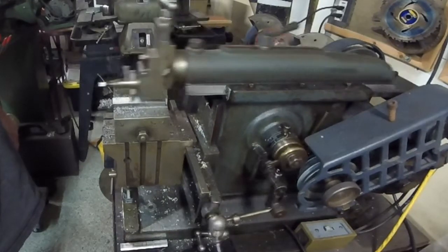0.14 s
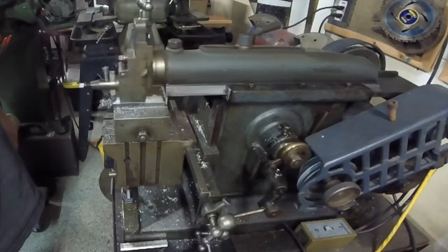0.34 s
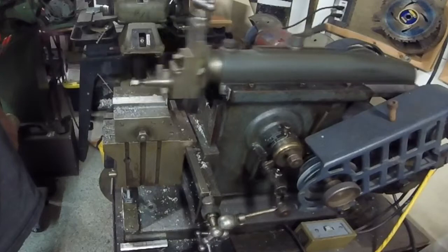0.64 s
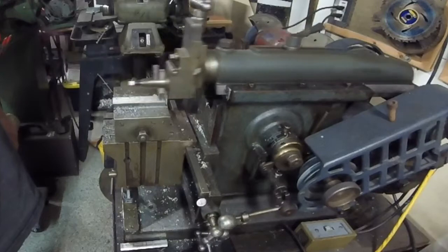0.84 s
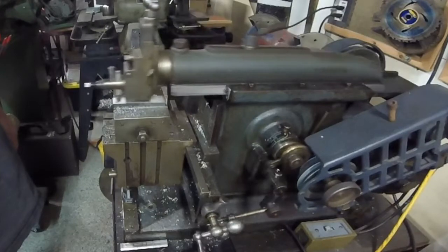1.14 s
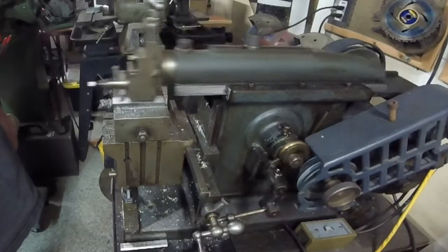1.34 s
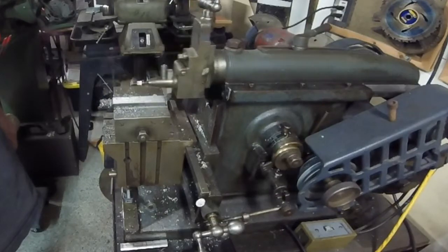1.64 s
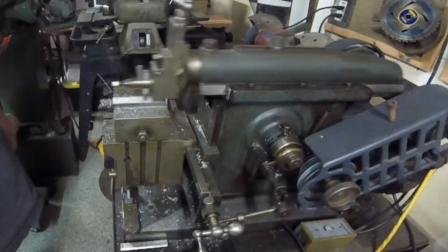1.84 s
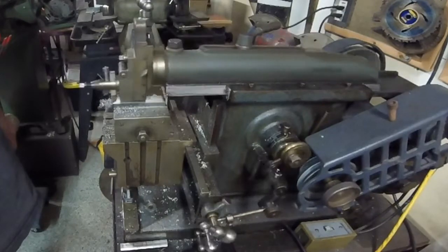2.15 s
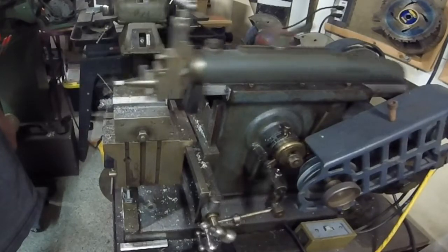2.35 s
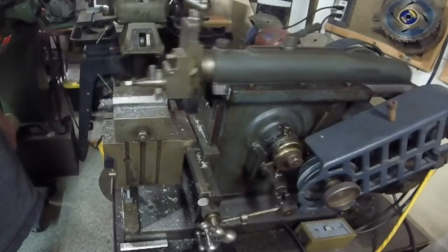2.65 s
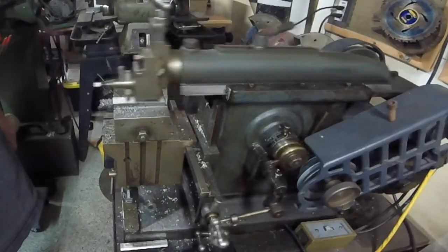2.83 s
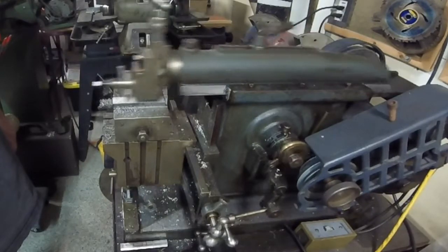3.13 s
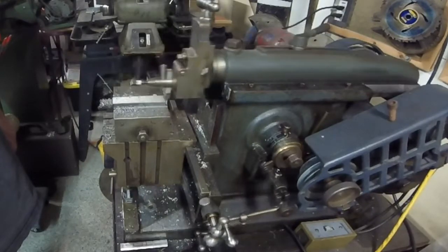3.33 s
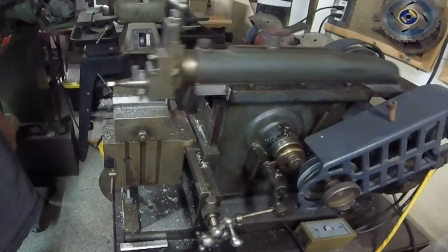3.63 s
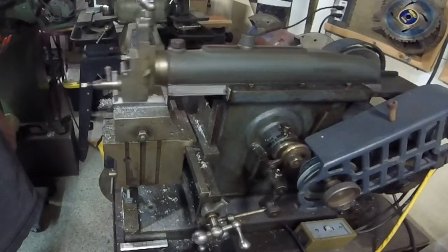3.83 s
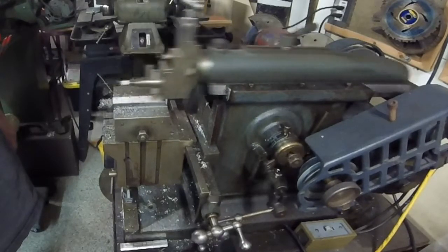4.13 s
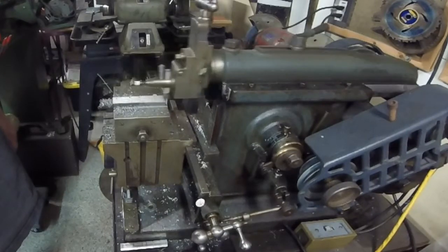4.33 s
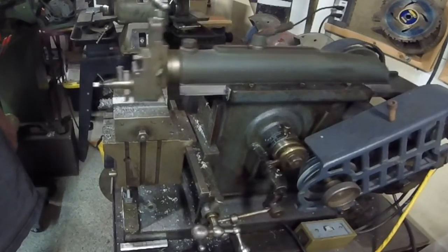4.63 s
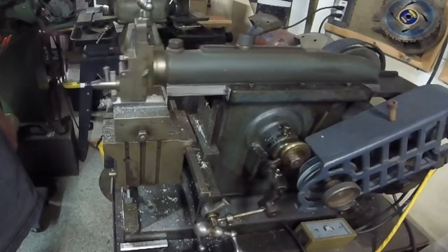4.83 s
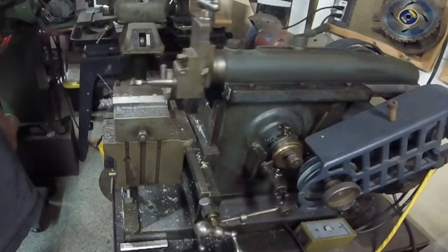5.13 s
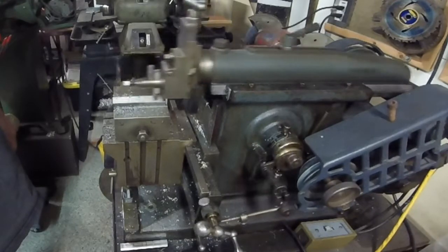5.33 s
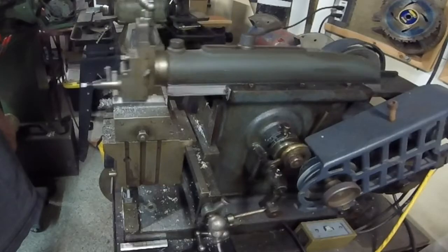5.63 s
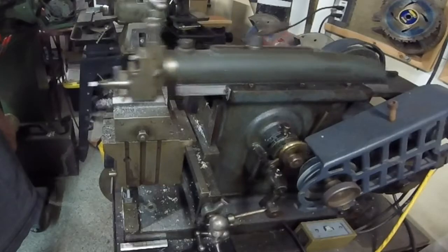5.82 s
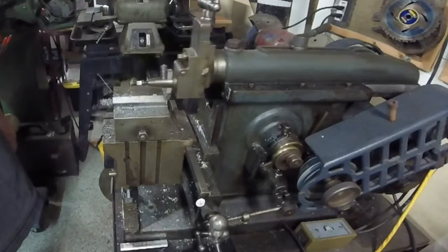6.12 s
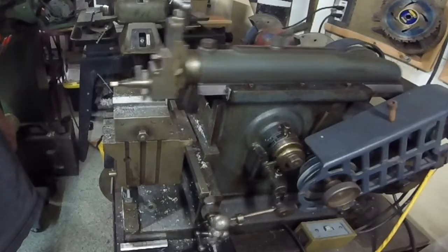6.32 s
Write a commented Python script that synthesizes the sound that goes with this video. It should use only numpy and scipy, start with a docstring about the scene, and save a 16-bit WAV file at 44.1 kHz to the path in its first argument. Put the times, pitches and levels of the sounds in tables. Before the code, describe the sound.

A metal shaper runs for about six and a half seconds, heard from close beside it in a small workshop with a short echo. A low electric motor hum and belt noise continue throughout. Every 0.9 seconds a ratchet gives four quick, bright metallic clicks, starting at about 0.6, 1.4, 2.3, 3.2, 4.1, 5.0 and 5.9 seconds. Just after each burst, the linkage gives a dull knock and then a softer one, with a slight metallic ring. The gears rumble louder as the sliding arm drives forward, then ease off, along with a faint rubbing of oiled rails. An extra thud comes near 2 seconds. The cutting tool scrapes the metal lightly with a thin ringing edge at around 2.7 seconds, more faintly near 3.8 and 5.4, and most clearly at about 6.2. The rhythm stays even to the end.

```python
"""In a small workshop, a metal shaper (a machine that planes metal) makes one stroke every 0.9 s.
Its motor hums throughout. The gears rumble louder the faster the ram, the sliding arm that holds
the tool, drives forward. The linkage knocks when the ram turns and again as it gathers speed.
As the ram returns, the feed pawl, a small catch, clicks over four teeth of a ratchet wheel.
Now and then the tool scrapes the work."""
import sys
import numpy as np
from scipy import signal
from scipy.fft import rfft, irfft, next_fast_len
from scipy.io import wavfile

SR = 44100
rng = np.random.default_rng(int(sys.argv[2]) if len(sys.argv) > 2 else 0)


def generate_wav(sig):
    """Save sig (samples, or channels by samples) to the path in sys.argv[1] as 16-bit PCM at SR."""
    pcm = np.round(np.clip(np.atleast_2d(sig).T, -1, 1) * 32767).astype(np.int16)
    wavfile.write(sys.argv[1], SR, pcm)


N = 285315
TIME = np.arange(N) / SR
GEAR_REST_DB = -35.5  # gear level while the ram stands still

# One row per stroke, starting at its first pawl click; levels are relative: start_s, pawl_db, treble_db,
# clank_db, gear_load_db, thud_db, rod_turn_db, rod_speedup_db, hum_dip_delay_s, hum_change_db
STROKES = [(-0.337, -19, 3, 0, -0.5, -28, -40, -34.5, 0.29, 6),
           (0.5524, -18.5, 3, 0, -1.5, -4.5, -32.5, -33.5, .272, -8),
           (1.4422, -16.5, 4.5, 4.5, -0.7, 0, -46, -35.5, 0.33, -6),
           (2.3306, -16.5, 4.5, -2, 0, -3, -43, -31.5, 0.32, -21),
           (3.2167, -17.5, 5, -1, -0.5, -0.5, -37.5, -34, 0.25, -2),
           (4.1083, -18.5, 4, 4, -1, -2.5, -36, -32.5, 0.32, -15),
           (5.0196, -18, 3.5, 0.5, -1.4, 1, -39, -41, 0.26, -4),
           (5.906, -19.5, 5.5, -4, -1.5, -0.5, -30.5, -27.5, 0.3, -31)]
# Tone of the gears: pitch_hz, level_db
GEAR_TONE = [(100, -29), (135, 1), (185, -9.5), (270, -3), (340, 2.5), (450, -8.5), (560, -2), (660, -7.5),
             (800, -17.5), (1100, -20.5), (2200, -56)]
# Tone of the rails the ram slides on: pitch_hz, level_db
RAIL_TONE = [(500, 7), (850, 7.5), (1100, -1), (1500, -1), (1850, 4), (2120, 3), (2350, -12.5), (3200, -10),
             (5200, -13), (5600, -17.5), (6500, -11), (7300, -20), (8100, -14), (9000, -21), (12000, -26.5),
             (15000, -50)]
# Pitches that the cast metal body boosts or swallows: pitch_hz, width_hz, boost_db
BODY_PEAKS = [(151.6, 5.1, 4.5), (210, 14.5, 6.5), (235.6, 14, -12), (267.7, 10, 11), (316, 5.6, 3),
              (500, 12, 2), (546, 7.7, 11.5), (660, 33, 4.5), (762.6, 10.5, 5.5), (882, 13, 8),
              (1040, 20, -1), (1215, 36, 7.5), (1436, 14, 6), (5250, 78, 13)]


def from_db(db):
    """Turn decibels into a factor to multiply by."""
    return 10 ** (np.asarray(db) / 20)


def rms_one(x):
    """Scale a signal to an average strength (rms) of 1."""
    return x / np.sqrt(np.mean(x ** 2) + 1e-20)


def drift(rate_hz):
    """A random wobble of strength 1, mostly slower than rate_hz."""
    step = 40
    count = N // step + 2
    hz = np.fft.rfftfreq(count, step / SR)
    slow = irfft(rfft(rng.standard_normal(count)) / (1 + (hz / rate_hz) ** 2))
    return np.interp(np.arange(N) / step, np.arange(len(slow)), rms_one(slow))


def colour(x, tone, peaks=()):
    """Give a signal the broad tone and narrow peaks of an object; the result has strength 1."""
    size = next_fast_len(len(x), True)
    hz = np.fft.rfftfreq(size, 1 / SR) + 1e-3
    points, levels = np.transpose(tone)
    db = np.interp(np.log(hz), np.log(points), levels)
    for centre, width, peak_db in peaks:
        db = db + peak_db / (1 + (2 * (hz - centre) / width) ** 2)
    roll_off = np.minimum(1, hz / points[0]) ** 2 * np.minimum(1, points[-1] / hz) ** 2
    return rms_one(irfft(rfft(x, size) * from_db(db) * roll_off, size)[:len(x)])


def fade(t, fade_s):
    """Die away by 60 dB every fade_s seconds."""
    return np.exp(-np.log(1000) * t / fade_s)


def ring(notes, t, spread_db):
    """A struck object rings with several fading notes, each at a slightly random strength."""
    hz, db, fade_s = np.transpose(notes)[:, :, None]
    strength = from_db(db + spread_db * rng.standard_normal(hz.shape)) * rng.choice([-1, 1], hz.shape)
    return np.sum(strength * np.sin(2 * np.pi * hz * t) * fade(t, fade_s), axis=0)


def add(track, start_s, sound):
    """Mix in a sound if its start lies within the track."""
    start = round(start_s * SR)
    if 0 <= start < N:
        track[start:start + len(sound)] += sound[:N - start]


def swing(start_s, length_s):
    """The ram's speed on one crank-driven pass: from 0 up to 1 and back."""
    return np.sin(np.pi * np.clip((TIME - start_s) / length_s, 0, 1))


def drive_levels(turn_s=0.258, return_s=0.355):
    """Gear and ram levels in dB follow the ram's speed: quickly back, then more slowly forward."""
    periods = np.diff([row[0] for row in STROKES])
    forward = back = load_db = 0
    for (start_s, _, _, _, gear_load_db, *_), period in zip(STROKES, [*periods, np.median(periods)]):
        speed = swing(start_s + turn_s, period - return_s)
        forward += speed
        load_db += gear_load_db * speed
        back += swing(start_s + turn_s - return_s, return_s)
    gear_db = GEAR_REST_DB + 13 * forward + 0.5 * back + load_db
    ram_db = -47.5 + 9.5 * forward + 4 * back
    return gear_db, ram_db


def hum_dips(width_s=0.02, swell_delay_s=0.09, swell_share=0.15, steady_db=0.33):
    """The hum briefly dips and swells once a stroke, beating against a nearby low resonance."""
    level_db = steady_db
    for start_s, *_, delay_s, change_db in STROKES:
        t = TIME - start_s - delay_s
        dip = np.exp(-(t / width_s) ** 2)
        swell = swell_share * np.exp(-((t - swell_delay_s) / width_s) ** 2)
        level_db += change_db * (dip - swell)
    return level_db


def motor(gear_db, wobble_hz=7, belt_rest_db=-34.5, follow_share=0.27):
    """Mains power makes a magnetic hum, shaken by belts that run rougher as the gears work harder."""
    # The notes of the hum: pitch_hz, level_db, wobble_share (0 to 1)
    hum_notes = [(59.4, -51.5, 0.2), (120.33, -26.5, 0.03), (240.6, -40.5, 0.41), (359.8, -38, 0.36)]
    # Tone of the belts and motor fan: pitch_hz, level_db
    belt_tone = [(12, -24), (28, -6.5), (60, -0.5), (92, -8), (112, 13), (138, 13.5), (175, -4),
                 (260, -5.5), (350, -3), (450, -20), (600, 0.5), (1000, -19), (2100, -25.5), (2600, -25),
                 (6500, -38.5), (12000, -63)]
    hum = np.zeros(N)
    for hz, db, wobble in hum_notes:
        phase = 2 * np.pi * (hz * TIME + rng.random())
        note = (1 + wobble * drift(wobble_hz)) * np.sin(phase)
        pitch_waver = wobble * drift(wobble_hz) * np.cos(phase)
        hum += np.sqrt(2) * from_db(db) * (note + pitch_waver)
    belt_db = belt_rest_db + follow_share * (gear_db - GEAR_REST_DB)
    belts = from_db(belt_db) * colour(rng.standard_normal(N), belt_tone, BODY_PEAKS)
    return hum * from_db(hum_dips()) + belts


def gears(level_db, clashes_per_s=500, spread_db=2.4, churn_db=-3):
    """Worn teeth clash unevenly and shake the machine's body."""
    sizes = from_db(spread_db * np.minimum(rng.exponential(1, N), 4)) * rng.choice([-1, 1], N)
    clashes = rms_one(sizes * (rng.random(N) < clashes_per_s / SR))
    churn = from_db(churn_db) * rng.standard_normal(N)
    return from_db(level_db) * colour(clashes + churn, GEAR_TONE, BODY_PEAKS)


def ram(level_db):
    """The ram rubs along its oiled rails with a slightly uneven grip."""
    grip_db = drift(rate_hz=27)
    return from_db(level_db + grip_db) * colour(rng.standard_normal(N), RAIL_TONE, BODY_PEAKS)


def knocks(contact_s=0.0017, thud_trim_db=-1, falloff_db_per_octave=16):
    """Slack in the drive snaps shut: gears judder, the main column thuds, the feed rod rings."""
    # Knocks as the ram turns and as it speeds up: delay_s, thud_db, strongest_rod_pitch_hz
    slack_knocks = [(0.259, -22.5, 2098), (0.408, -29, 1690)]
    # Ringing of the cast column: pitch_hz, level_db, fade_s
    column_notes = [(290, -0.5, 0.091), (322, 6.5, 0.039), (348, 3.5, 0.063), (560, -13.5, 0.017),
                    (620, -10, 0.066)]
    # Ringing of the feed rod: pitch_hz, level_db, fade_s
    rod_notes = [(1314, 4, 0.11), (1850, 4.5, 0.15), (1910, -12, 0.1), (2064, 3, 0.13), (2174, -3, 0.1),
                 (2420, 4.5, 0.042)]
    # Stray bumps of the column in mid-stroke: start_s, level_db
    bumps = [(1.047, -19), (1.958, -10), (2.048, -22), (2.154, -26), (5.524, -14), (5.685, -22)]
    out, t = np.zeros(N), TIME[:SR // 4]
    onset = 1 - np.exp(-t / contact_s)
    for start_s, *_, thud_db, turn_db, speedup_db, _, _ in STROKES:
        for (delay_s, column_db, strongest_hz), rod_db in zip(slack_knocks, (turn_db, speedup_db)):
            judder = from_db(-1) * colour(rng.standard_normal(len(t)), GEAR_TONE) * fade(t, 0.2)
            column = ring(column_notes, t, spread_db=1.5)
            thud = from_db(column_db + thud_db + thud_trim_db) * (column + judder)
            rattle = from_db(-2) * colour(rng.standard_normal(len(t)), RAIL_TONE) * fade(t, 0.12)
            notes = [(hz, db - falloff_db_per_octave * abs(np.log2(hz / strongest_hz)), fade_s)
                     for hz, db, fade_s in rod_notes]
            rod = from_db(rod_db) * (from_db(-4) * ring(notes, t, spread_db=0.5) + rattle)
            add(out, start_s + delay_s, onset * (thud + rod))
    for start_s, db in bumps:
        add(out, start_s, onset * from_db(db + thud_trim_db) * ring(column_notes, t, spread_db=1.5))
    return workshop_echo(out)


def workshop_echo(x, echo_db=-7, fade_s=0.15):
    """The cluttered walls add a short, blurred echo to a sound."""
    t = TIME[:SR // 2]
    tail = rng.standard_normal(len(t)) * fade(t, fade_s) * (t > 0.005)
    return x + from_db(echo_db) * signal.fftconvolve(x, tail / np.linalg.norm(tail))[:N]


def ratchet(echo_s=0.0058, alike_share=0.65, edge_hz=6000, clank_hz=(2880, 3700), build_s=0.001):
    """The pawl snaps onto the wheel, which rings; the crack bounces off the machine and the room."""
    # Tone of the wheel's crack: pitch_hz, level_db
    wheel_tone = [(400, 9.5), (900, -0.5), (1300, 4.5), (2050, 3), (2450, -4), (3150, 3), (4000, 1.5),
                  (5300, 3), (5650, -6), (6200, 4), (7450, -4), (8100, -2), (9300, -8.5), (12200, -12.5),
                  (15000, -35)]
    # Ringing of the wheel: pitch_hz, level_db, fade_s
    wheel_notes = [(1222, 3.5, 0.11), (1405, -2.5, 0.11), (1510, -9, 0.058), (2034, 2.5, 0.11),
                   (2530, -1, 0.06), (3050, 4.5, 0.049), (3180, -3, 0.076), (3200, -3, 0.2),
                   (3400, -5, 0.072), (3580, -4, 0.2), (3900, -3, 0.14), (4340, -3, 0.11),
                   (4740, -5, 0.058), (5170, 1.5, 0.078), (5350, 2, 0.089), (5960, -8, 0.22),
                   (6600, -15, 0.093), (6480, -6, 0.23), (6890, -7.5, 0.2), (7925, -10, 0.19),
                   (8300, -6, 0.29), (11200, -22, 0.17)]
    # The pawl drops off each tooth in turn: delay_s, level_db
    teeth = [(0, -1.1), (0.0533, -0.2), (0.106, 0), (0.166, -0.44)]
    out, t = np.zeros(N), TIME[:SR // 3]
    echo = from_db(-0.5) * fade(np.abs(t - echo_s), 0.051) * (t > echo_s)
    room_tail = from_db(-8.5) * fade(t, 0.41) * (t > echo_s)
    crack_shape = np.sqrt(fade(t, 0.033) ** 2 + echo ** 2 + room_tail ** 2)
    # every tooth rings the same wheel, but is hit a little differently
    shared_noise = np.sqrt(alike_share) * rng.standard_normal(len(t))
    treble_filter = signal.butter(1, edge_hz, "high", fs=SR, output="sos")
    clank_filter = signal.butter(1, clank_hz, "band", fs=SR, output="sos")
    for start_s, pawl_db, treble_db, clank_db, *_ in STROKES:
        for delay_s, tooth_db in teeth:
            own_noise = np.sqrt(1 - alike_share) * rng.standard_normal(len(t))
            crack = from_db(-9) * colour(shared_noise + own_noise, wheel_tone) * crack_shape
            click = crack + from_db(-21) * ring(wheel_notes, t, spread_db=3)
            click += (from_db(clank_db) - 1) * signal.sosfilt(clank_filter, click)
            # the bright edge of steel on steel comes at once; the rest takes a moment to build
            edge = signal.sosfilt(treble_filter, click)
            body = (click - edge) * (1 - np.exp(-t / build_s))
            add(out, start_s + delay_s, from_db(pawl_db + tooth_db) * (from_db(treble_db) * edge + body))
    return out


def scrapes(rough_db=0.5, ring_s=0.1):
    """The tool's edge catches the work, and its holder sings briefly at many pitches."""
    # Each catch of the tool: start_s, level_db, rise_s, fade_s
    catches = [(2.610, -34.5, 0.0094, 0.46), (2.761, -33.5, 0.021, 0.46), (3.721, -40, 0.0035, 0.097),
               (3.924, -39.5, 0.004, 0.23), (4.445, -45, .008, 0.53), (5.420, -40, 0.019, 0.56),
               (5.600, -48, 0.0067, 0.18), (6.222, -30, 0.015, 0.39), (6.312, -31, .05, 0.46)]
    # Tone of the tool: pitch_hz, level_db
    tool_tone = [(700, 3), (2000, -1.5), (2400, -5.5), (3200, 2), (5000, 1.5), (6500, 1), (7400, -3),
                 (8400, -1.5), (9300, -8), (11500, -12), (15000, -28)]
    # Pitches that the tool boosts or swallows: pitch_hz, width_hz, boost_db
    tool_peaks = [(1443, 22, 23), (2114, 40, 19.5), (3090, 28, 10.5), (3350, 36, 6.5), (4260, 70, -12),
                  (4200, 26, 16), (5120, 110, 14.5), (5850, 28, 4), (6450, 140, 7), (7100, 35, 7),
                  (7990, 80, 11), (9350, 100, 9), (11000, 80, 6)]
    force, t = np.zeros(N), TIME[:SR // 5]
    for start_s, db, rise_s, fade_s in catches:
        age = TIME - start_s
        force += from_db(db) * np.clip(age / rise_s, 0, 1) * fade(np.maximum(age - rise_s, 0), fade_s)
    friction = rng.standard_normal(N)
    holder_ring = rng.standard_normal(len(t)) * fade(t, ring_s)
    holder = rms_one(signal.fftconvolve(friction, holder_ring)[:N])
    roughness = from_db(rough_db * drift(rate_hz=70))
    return force * roughness * colour(friction + holder, tool_tone, tool_peaks)


def scene():
    """The whole machine, heard from beside it, in one channel."""
    gear_db, ram_db = drive_levels()
    return (motor(gear_db) + gears(gear_db) + ram(ram_db) + ratchet() + knocks() + scrapes())[None]


def record(dry):
    """Cut away the very highest treble."""
    cutoff_hz = 15700
    return signal.sosfilt(signal.ellip(10, 0.1, 90, cutoff_hz, fs=SR, output="sos"), dry)


dry = scene()
out = record(dry)
generate_wav(out)
```